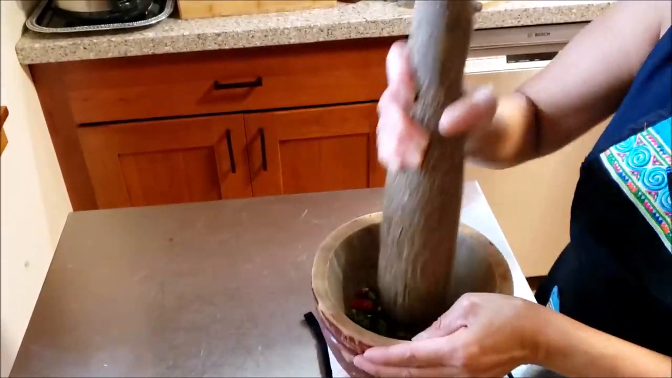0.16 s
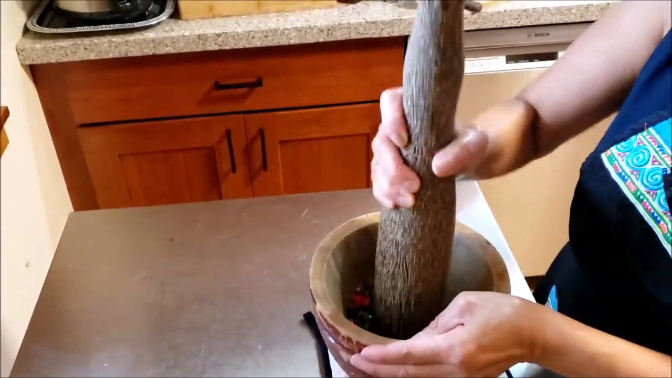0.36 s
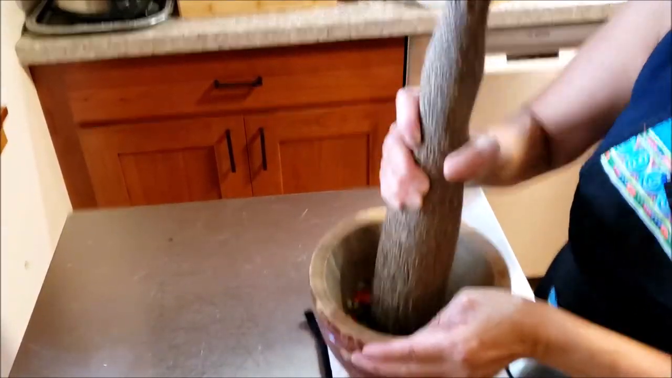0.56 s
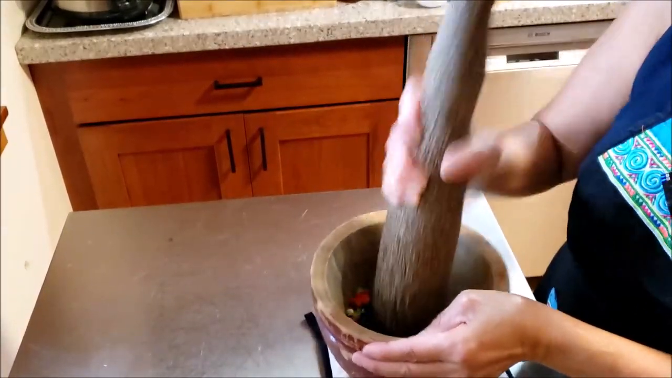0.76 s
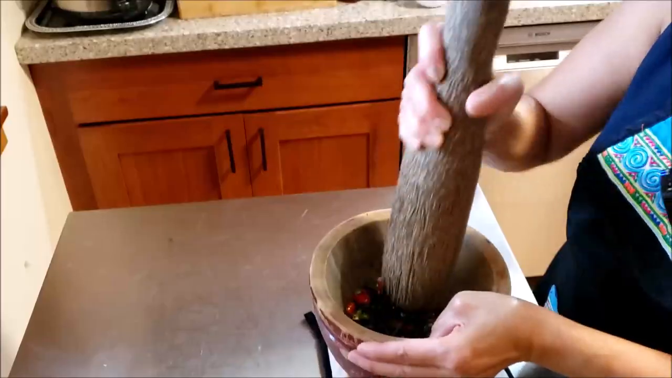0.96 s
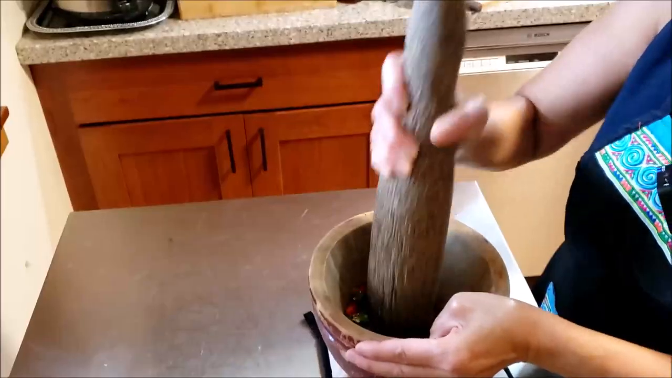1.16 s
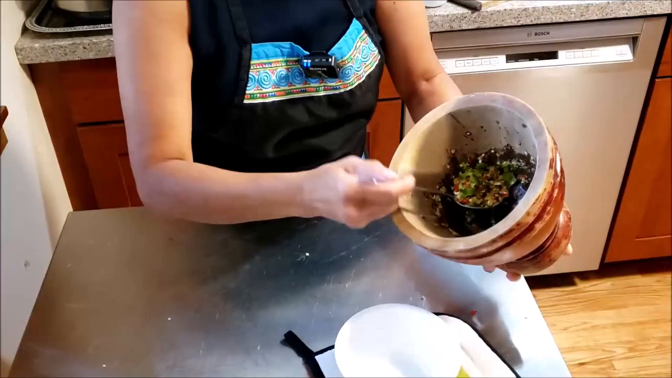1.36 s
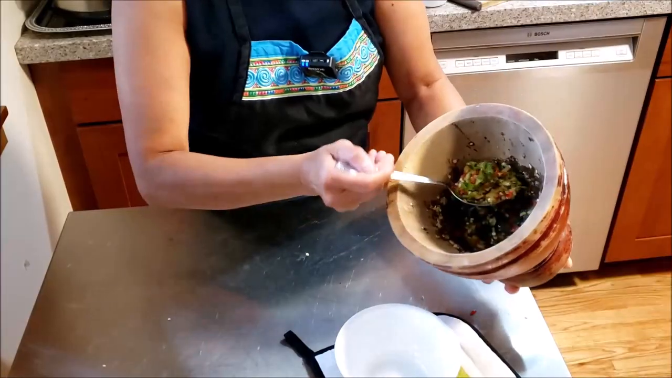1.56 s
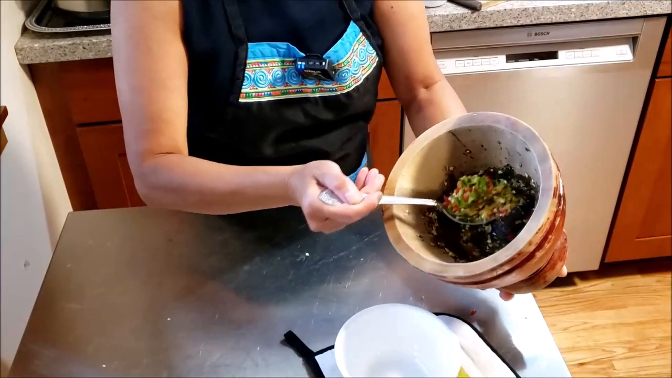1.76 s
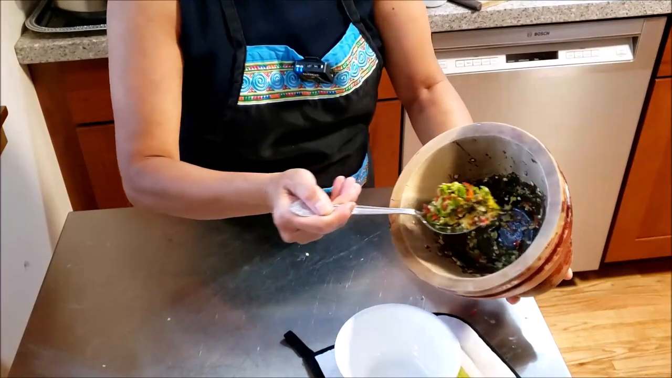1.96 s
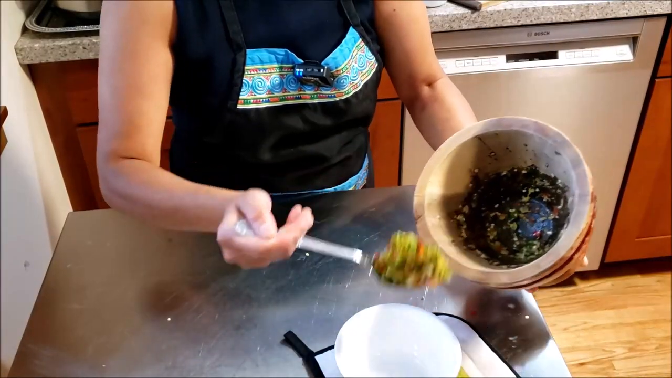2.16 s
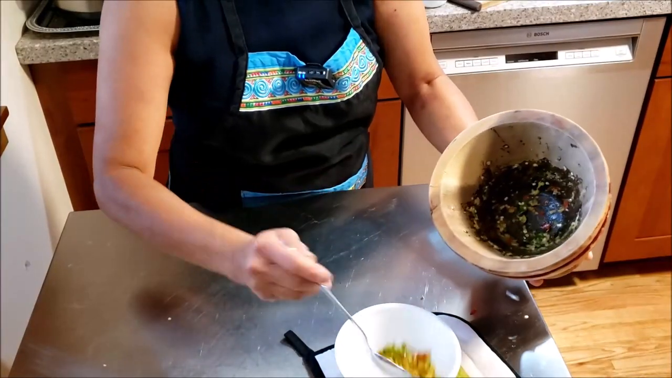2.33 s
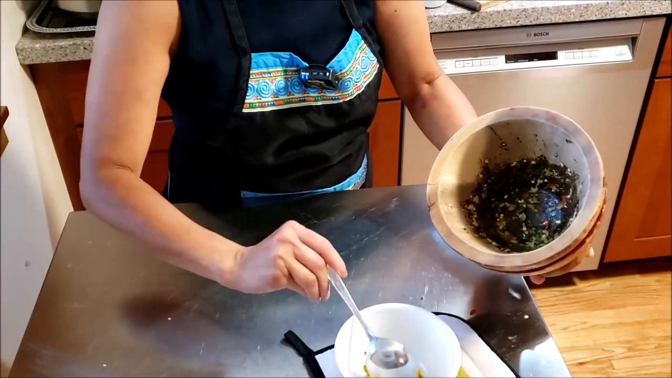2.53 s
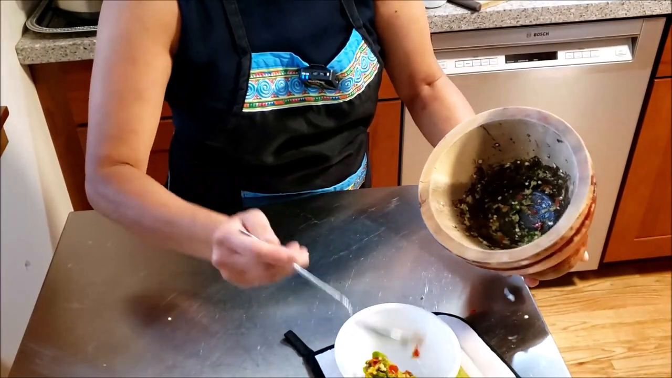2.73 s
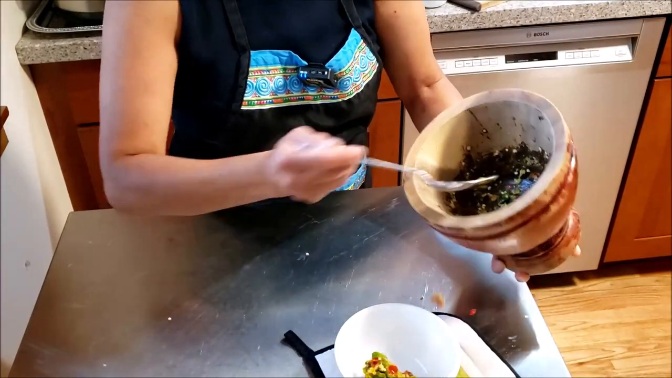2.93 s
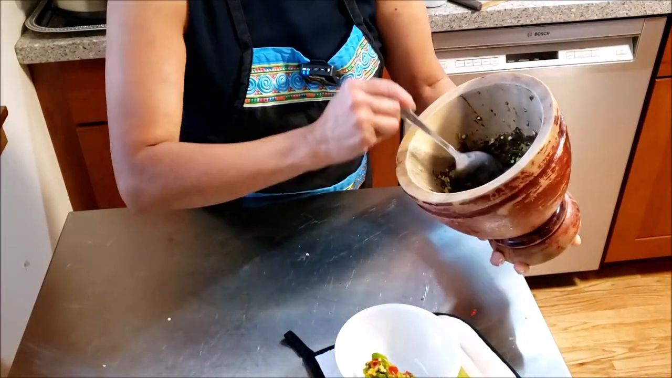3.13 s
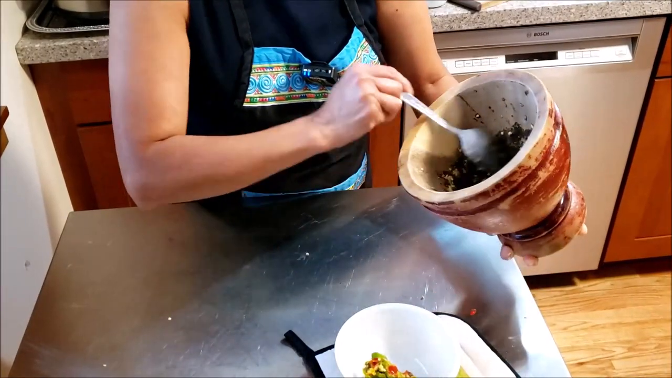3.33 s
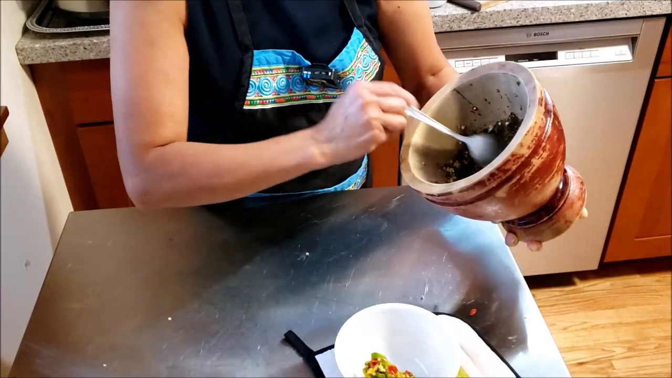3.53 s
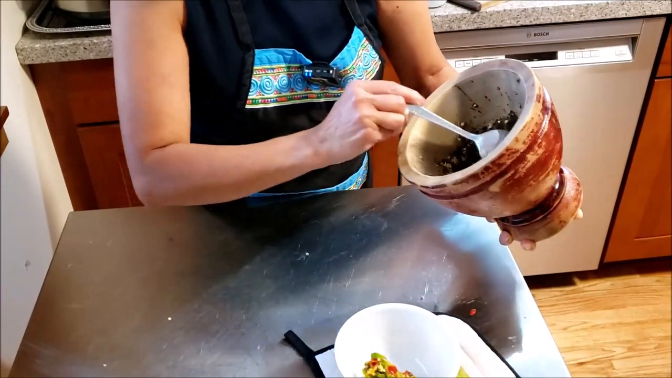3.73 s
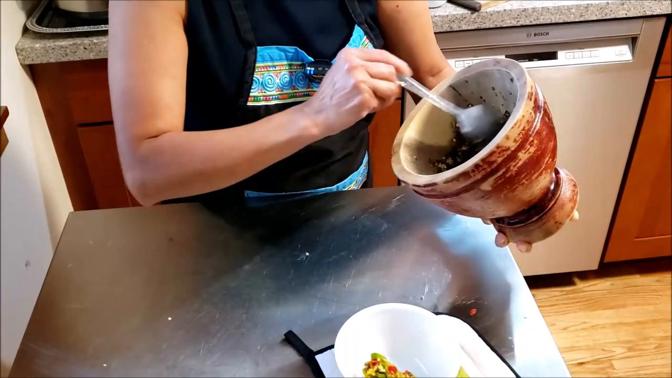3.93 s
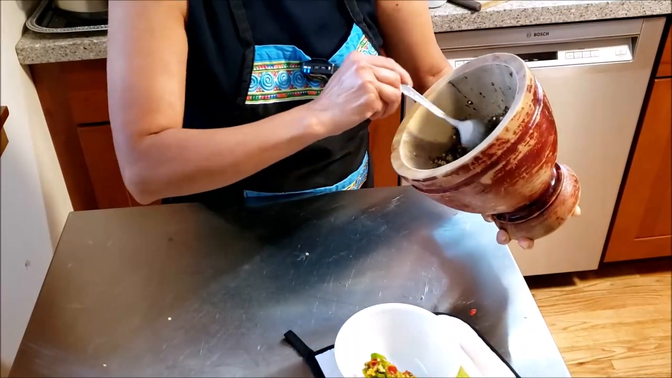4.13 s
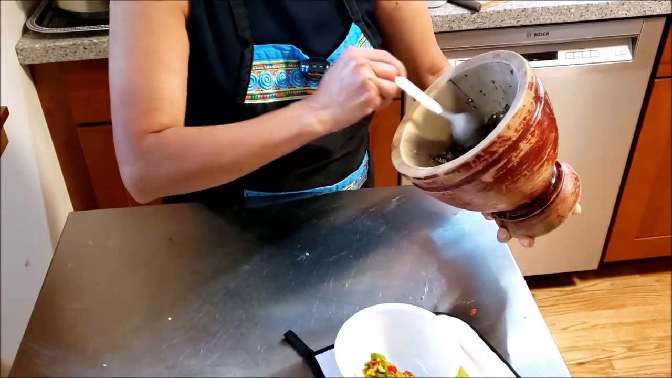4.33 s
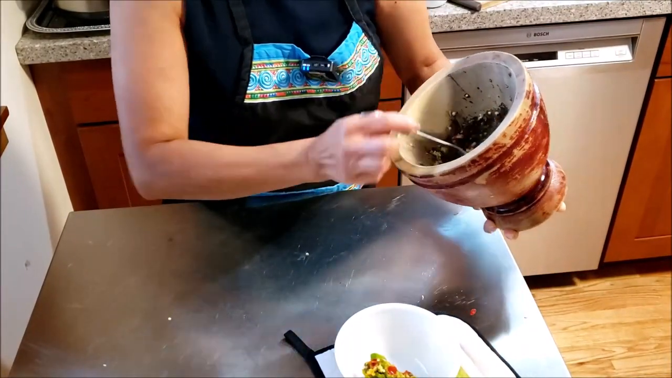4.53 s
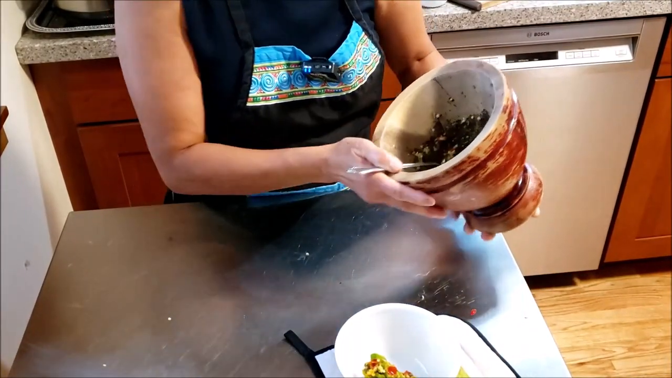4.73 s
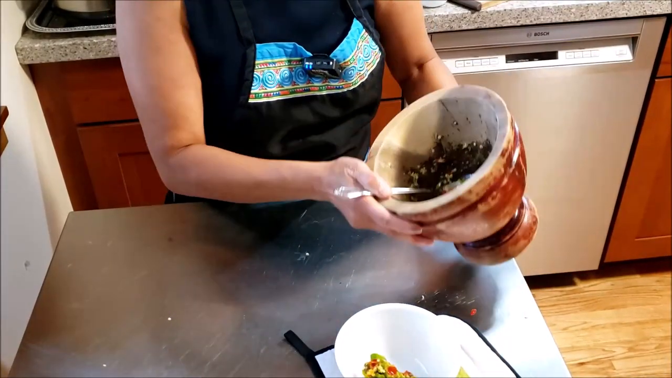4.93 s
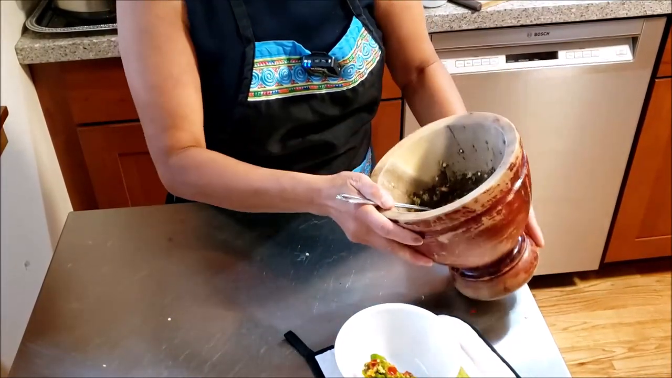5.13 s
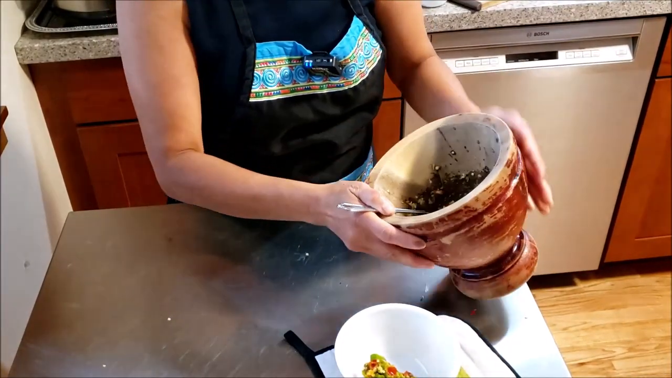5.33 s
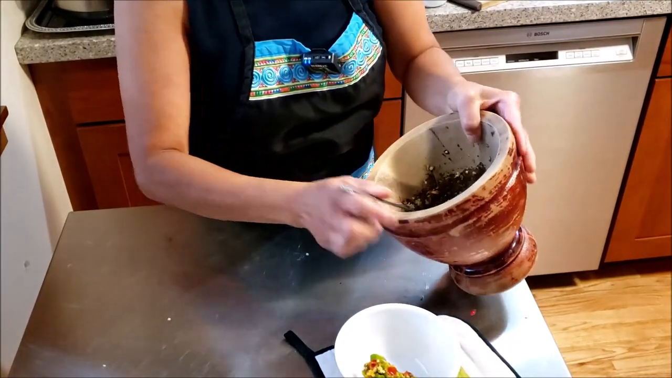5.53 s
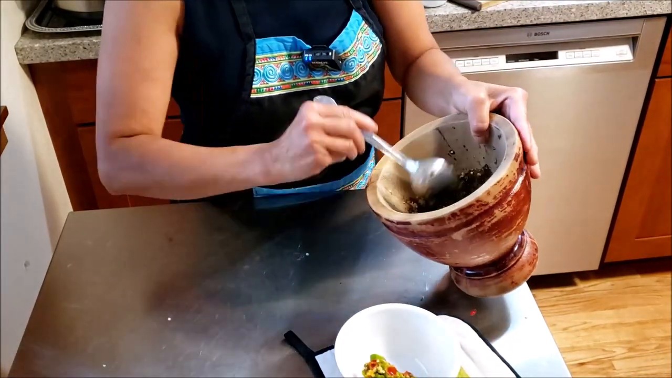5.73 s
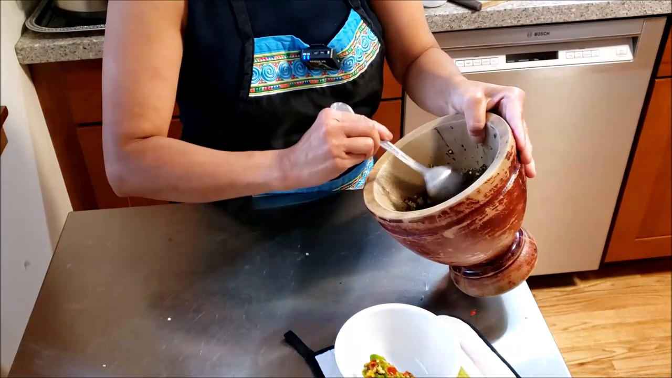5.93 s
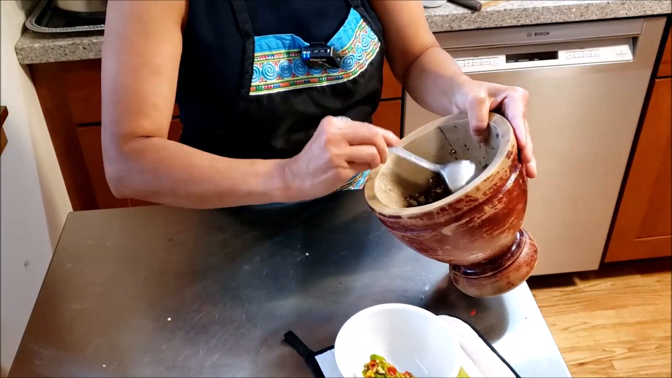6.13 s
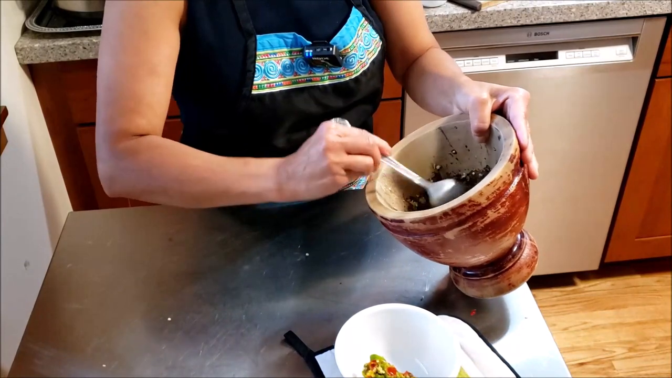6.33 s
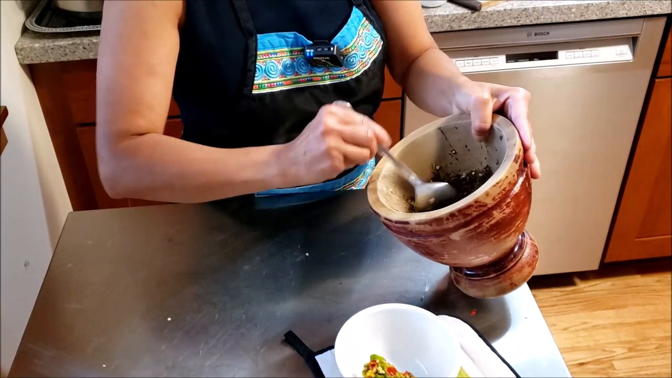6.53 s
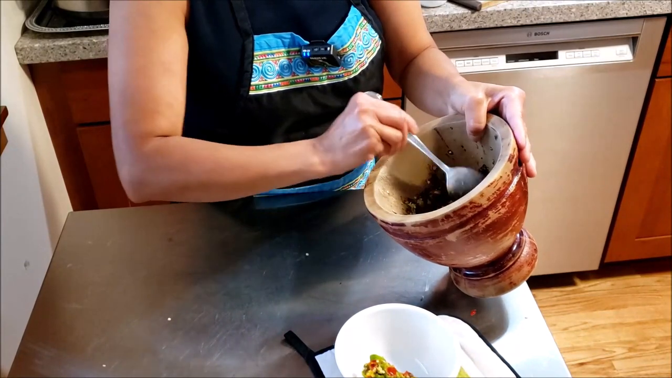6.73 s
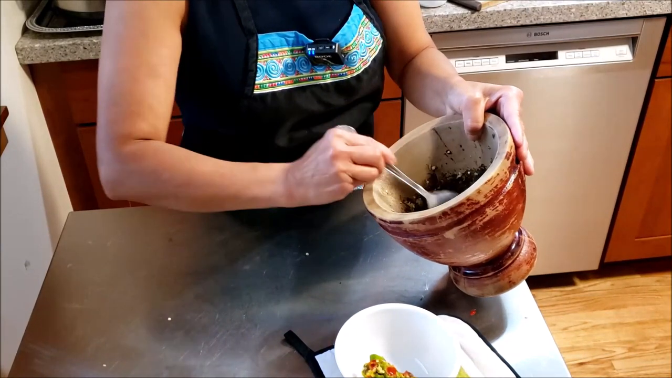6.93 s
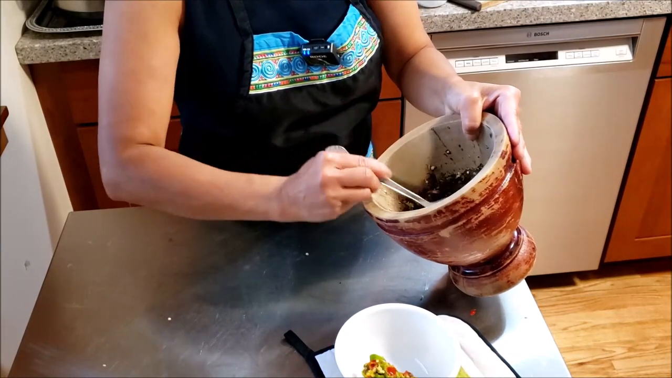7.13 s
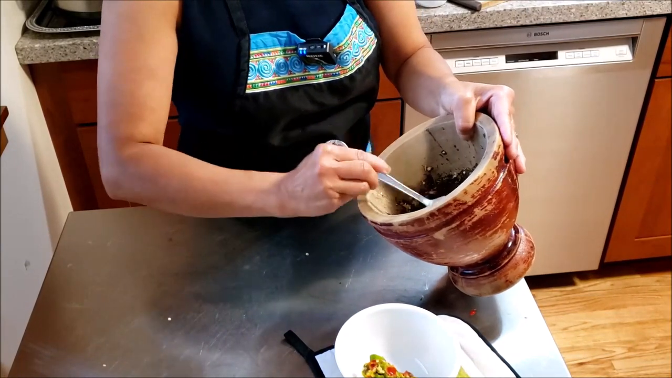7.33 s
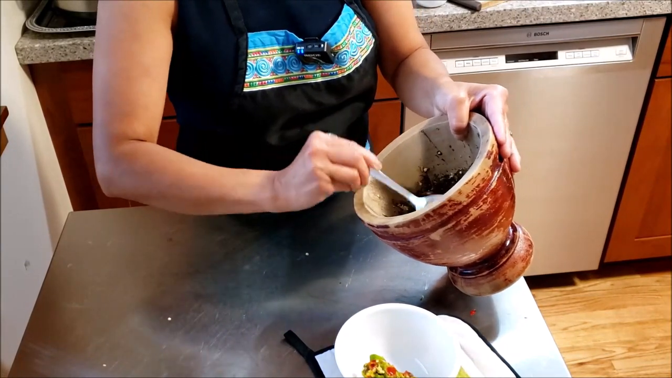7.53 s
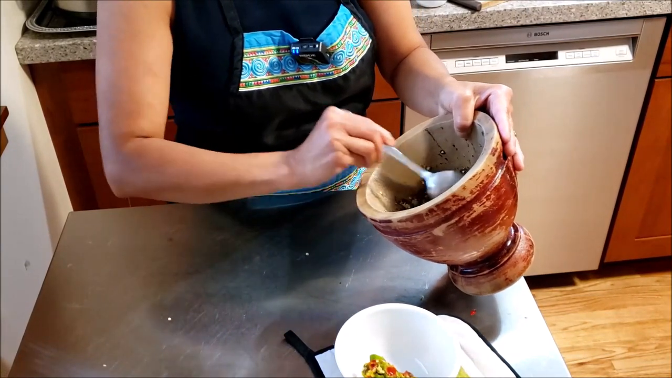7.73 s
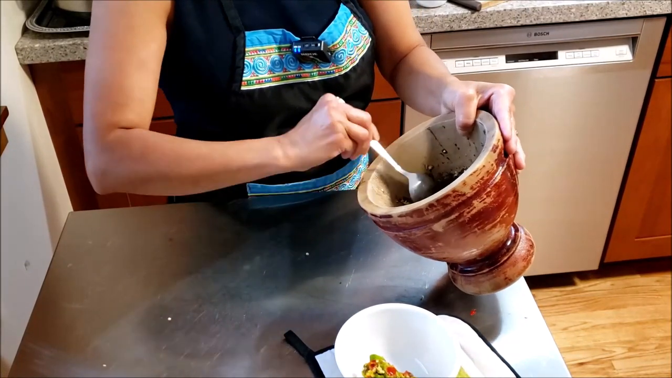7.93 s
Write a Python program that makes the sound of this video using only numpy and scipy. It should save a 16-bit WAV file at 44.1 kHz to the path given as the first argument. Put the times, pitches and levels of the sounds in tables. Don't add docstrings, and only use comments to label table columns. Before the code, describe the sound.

Five hollow wood-on-wood pounding blows with leafy crunches, a cut to a quiet pause, then busy spoon knocks and scrapes around a resonant mortar.

```python
import sys
import numpy as np
from scipy import signal
from scipy.fft import rfft, irfft, next_fast_len
from scipy.io import wavfile
from scipy.ndimage import uniform_filter1d, map_coordinates

SR = 44100
rng = np.random.default_rng(int(sys.argv[2]) if len(sys.argv) > 2 else 0)


def level_to_linear(level):
    exponent = np.asarray(level, float) / 20
    return 10 ** exponent


def wav_out(sig):
    wavfile.write(sys.argv[1], SR, np.round(np.clip(np.atleast_2d(sig).T, -1, 1) * 32767).astype(np.int16))


N = 355887
CUT_S = 1.318
REGRIP_S = 4.7

# (frequency [Hz], level per Hz [dB])
HUM = [(15, -54), (25, -27), (53, 0.5), (97, 1.5), (135, -4), (388, -17.5), (553, -35), (854, -26.5),
       (2040, -29), (6910, -28.5), (7710, -32), (8590, -35.5), (15700, -46), (16500, -54)]
# (time [s], level [dB])
MURMUR = [(0, -49), (1.3, -44.5), (1.34, -59), (2.4, -65.5), (2.6, -59.5), (3.05, -46.5), (3.8, -51),
          (4.65, -62.5), (5.85, -63), (8.07, -71)]
# (frequency [Hz], T60 [s])
KITCHEN_T60 = [(80, 0.19), (300, 0.54), (1000, 0.51), (3000, 0.36), (8000, 0.35), (16000, 0.27)]
# (time [s], peak [dB], pitch [Hz], length [s])
BUMPS = [(1.594, -21, 112, .03), (1.622, -31, 100, .028), (1.641, -22, 129, .034), (1.675, -37, 80, .04),
         (1.712, -31, 97, .035), (1.75, -20, 108, .045), (1.788, -27, 90, .035), (1.82, -26, 110.3, .038),
         (1.862, -24, 112, .03), (1.898, -29, 102, .028), (1.92, -29, 100, .03), (1.985, -41, 90, .06)]
# (time [s], length [s], level [dB], lowest frequency [Hz])
RUBS = [(1.469, 0.23, -56.5, 1630), (2.537, 0.19, -60, 2640), (4.776, 0.15, -47.5, 2850),
        (4.882, 0.43, -52, 2920), (4.761, 0.89, -61, 2580), (5.309, 0.082, -48.5, 2980),
        (5.39, 0.23, -52, 2600), (5.474, 0.25, -51, 2630)]

# (frequency [Hz], width [Hz], level [dB])
COUNTER = [(46, 14, -10.5), (66.4, 11, -22), (88, 10.5, 3.5), (129.3, 20, 4.5), (190, 44, -4.5)]
# (frequency [Hz], width [Hz], level [dB])
BELLY = [(232, 6.4, -15.5), (268.1, 10.3, 1), (348.7, 55, 1.5), (458.4, 63, -2)]
# (frequency [Hz], width [Hz], level [dB])
BOWL = [(566.3, 73, 0.43), (650, 83, -1.7), (702.5, 17.8, -1.2), (828.4, 32.3, -0.31), (1102, 233, 0.098)]
# (frequency [Hz], width [Hz], level [dB])
SPOON = [(1350, 150, -16.5), (1550, 27, -10.5), (1790, 19.4, -13), (2150, 99, -11.5), (2250, 64, -17.5),
         (2640, 30, -10), (3110, 37, -7), (3600, 37, -10), (4530, 94, -14), (5150, 66, -13.5),
         (7250, 180, -24)]
# (frequency [Hz], width [Hz], level [dB])
SPOON_TIP = [(7250, 90, -10), (8250, 80, 0), (9000, 150, -11), (11100, 110, -4), (11750, 140, -6),
             (12500, 110, -10), (14150, 130, -9), (15500, 130, -10)]
# (frequency [Hz],
# width [Hz], level [dB])
PESTLE = [(135, 36, 12), (460, 120, -1.5), (575, 40, 1), (814, 60, 2.5), (1090, 99, -8), (1540, 110, -24.5)]
# (frequency [Hz], level per Hz [dB])
HERBS = [(710, -52.5), (1200, -3), (1320, -14), (1490, -3), (2030, -6.5), (3400, -2.5), (6640, -6),
         (14900, -29), (16000, -39), (16500, -48.5)]

# (time [s], belly peak [dB], thud [dB], rattle [dB])
SET_DOWN = [
    (5.174, -5.5, -8, -10),
    (5.241, -14, -5.5, -9.5),
]
FOOT_DOWN_S = SET_DOWN[0][0]
# (time [s], peak [dB], pitch [Hz], body level [dB], body pitch [Hz])
TICKS = [(1.835, -61, 4600, 8, 405), (2.457, -44.5, 4300, -25, 890), (2.499, -48, 3870, -19, 950),
         (2.5736, -39.5, 4100, 2, 406), (2.7684, -45, 7100, -16, 907), (4.062, -52, 5460, -16, 900),
         (7.106, -61, 8000, -12, 900)]
# (time [s], length [s], bowl level [dB], spoon level [dB], fade over half the stroke [dB])
DRAGS = [(3.093, 0.032, -32.5, -41.5, 6), (3.139, 0.03, -30.5, -45, 2), (3.281, 0.015, -50, -48, 6.5),
         (3.332, 0.046, -29, -45.5, 7), (3.371, 0.037, -36, -48, 1.5), (3.591, 0.055, -28, -30, -7),
         (3.833, 0.023, -34, -41.5, 2.5), (3.851, 0.067, -30.5, -45.5, 2), (4.039, 0.024, -35, -58, 2),
         (4.075, 0.071, -37, -44.5, 5), (4.289, 0.088, -27.5, -42.5, -4), (4.389, 0.024, -43, -33, 7),
         (4.511, 0.057, -47.5, -48, 5), (4.718, 0.042, -39, -59, 3.5), (5.468, 0.029, -45, -38, 4.5),
         (5.597, 0.057, -43, -71, -4), (5.89, 0.063, -29.5, -23, 1.5), (6.049, 0.046, -28, -30.5, 3.5),
         (6.207, 0.064, -35, -39.5, 3), (6.265, 0.068, -33.5, -41.5, -.5), (6.448, 0.056, -45, -43, 11.5),
         (6.49, 0.11, -46, -45.5, 7.5), (6.673, 0.044, -37.5, -38, -1), (6.717, 0.1, -36.5, -42.5, 6),
         (6.968, 0.068, -32, -48, 3.5), (7.167, 0.042, -41, -44.5, 4.5), (7.202, 0.058, -32, -49.5, 3),
         (7.405, 0.052, -32, -47.5, 6), (7.6, 0.019, -33.5, -60, 1.5), (7.634, 0.05, -32, -41.5, 0),
         (7.865, 0.054, -33.5, -44.5, 1.5), (7.897, 0.058, -31, -53, -2)]
# (time [s], length
# [s], level [dB], pitch [Hz])
SINGS = [(3.337, 0.038, -31.5, 2820), (3.83, 0.017, -40, 2560), (3.882, 0.044, -43, 2510),
         (3.938, 0.01, -30, 3110), (4.078, 0.026, -28, 3620), (4.079, 0.02, -32, 4820),
         (4.357, .03, -35, 2520), (4.391, 0.016, -29.5, 2420), (4.542, 0.0095, -29.5, 7500),
         (4.721, 0.025, -29, 1760), (4.868, 0.046, -43.5, 3000), (4.87, 0.05, -44, 3670),
         (4.722, 0.057, -29, 877), (2.458, .014, -53, 4300), (2.574, 0.06, -52, 1175),
         (5.468, 0.05, -38.5, 900), (5.895, 0.062, -28.5, 1820), (6.215, .03, -38, 2560),
         (6.224, 0.049, -34, 4510), (6.231, 0.038, -32.5, 3180), (6.469, 0.038, -32, 3160),
         (6.473, 0.019, -31, 4640), (6.724, 0.014, -22.5, 3530), (6.978, 0.056, -39.5, 2480),
         (6.967, 0.055, -48, 5150), (7.176, 0.036, -52.5, 5150), (7.211, 0.024, -36, 2540),
         (7.415, 0.015, -30, 2570), (7.575, 0.019, -39, 3600), (7.611, 0.02, -30.5, 4480),
         (7.639, 0.043, -37, 2460), (7.89, 0.023, -44, 3070), (7.931, 0.015, -31, 2440),
         (7.903, 0.045, -35, 1800),
         (5.468, .018, -29.5, 1790), (7.1, .03, -40, 385), (4.55, .03, -40, 690), (3.6, 0.041, -33, 1100),
           (3.61, 0.043, -36, 2180), (3.085, 0.015, -31, 1790), (3.109, .018, -29, 2940),
           (3.111, 0.019, -34, 8200), (3.152, 0.024, -36, 2460), (3.595, 0.032, -15, 710),
           (3.598, 0.024, -32, 2540), (3.6, 0.028, -29, 1810), (3.2, 0.03, -37, 3000),
           (3.951, 0.024, -50, 2640), (6.05, 0.06, -24, 721), (6.722, 0.027, -34.5, 2570),
           (6.963, 0.067, -48.5, 8350), (4.9, 0.052, -56, 8250), (5.9, 0.036, -67, 7300),
           (4.9, 0.023, -42, 5150), (7.612, 0.048, -59, 8400), (6.8, 0.027, -36, 1810),
           (7.61, 0.017, -30.5, 3400)]
# (time [s], bowl peak [dB], bowl pitch [Hz], spoon peak [dB], spoon pitch [Hz])
LANDINGS = [(3.377, -10.5, 810, -13.5, 2420), (3.529, -6, 516, -11.5, 3360), (3.793, -15, 900, -17, 3370),
            (3.941, -39, 684, -13, 2170), (4.042, -18.5, 860, -26, 2640), (4.114, -11, 780, -21, 1690),
            (4.146, -10.5, 740, -25, 1930), (4.276, -13.5, 336, -9, 3280), (4.39, -25, 810, -15.5, 2200),
            (4.721, -17, 880, -15, 1790), (4.731, -19, 830, -26, 3110), (4.74, -15.5, 840, -21.5, 3110),
            (4.753, -25, 850, -26, 4650), (4.761, -19.5, 380, -23, 1790), (5.267, -19, 365, -26.5, 3110),
            (5.467, -25.5, 850, -6, 3700), (5.891, -8, 710, -6.5, 3110), (5.9, -9, 704, -12.5, 1790),
            (5.909, -9, 725, -12.5, 3110), (6.0477, -5, 710, -8.5, 1790), (6.2628, -15.5, 764, -18.5, 3320),
            (6.319, -20, 262, -25.5, 1680), (6.442, -11.5, 690, -14.5, 3110),
            (6.485, -20, 269, -20.5, 3600), (6.9263, -23, 720, -11.5, 3110),
            (6.926, -24.5, 706, -16.5, 1550), (7.5756, -13, 788, -13.5, 3200), (7.8447, -7, 732, -20, 3110),
            (7.938, -22, 842, -27, 1760)]
# (time [s], bowl peak [dB], bowl pitch [Hz], spoon peak [dB], spoon pitch [Hz])
EDGE_TAPS = [(3.082, -8, 832, -18.5, 1790), (3.119, -18, 710, -18, 2640), (3.286, -15, 344, -29.5, 3280),
             (3.33, -6, 723, -15.5, 2770), (3.838, -22, 708, -30, 2570), (3.85, -15, 694, -26, 2640),
             (4.514, -30, 576, -45, 2490), (4.543, -26, 718, -24.5, 2470), (5.585, -27.5, 385, -36, 3700),
             (5.622, -21.5, 880, -28, 1890), (6.205, -20, 900, -18.5, 3800),
             (6.6642, -13.5, 890, -14, 2120), (7.021, -17, 370, -23.5, 2860), (7.194, -15, 710, -28, 2540),
             (7.41, -14.5, 690, -24.5, 2640)]
# (time [s], bowl peak [dB], spoon peak [dB], spoon pitch [Hz])
CATCHES = [(3.058, -55, -37, 3000), (3.1525, -11, -23, 2650), (3.167, -15.5, -28.5, 2550),
           (3.403, -40, -25, 2510), (3.592, -4, -21, 2000), (3.598, -5.5, -22, 2590),
           (3.8535, -16, -30, 2800), (3.858, -12, -32, 2560), (3.8655, -14, -36, 2560),
           (3.8884, -14.5, -36, 2540), (3.884, -15, -41, 2540), (3.907, -19.5, -35, 2530),
           (3.928, -36, -36, 3110), (4.078, -15, -27, 3780), (4.103, -13.5, -21.5, 1790),
           (4.323, -13, -34, 1600), (4.329, -18, -34, 2520), (4.344, -16.5, -33, 2520),
           (4.3527, -14, -31, 2520), (4.361, -24, -28, 3600), (4.369, -17, -30, 2520),
           (4.3785, -15, -27, 2240), (5.886, -46, -36, 3900), (6.719, -26, -27, 3670),
           (6.758, -21.5, -30, 2620), (6.789, -20.5, -39, 3020), (6.9665, -10.5, -34, 3130),
           (6.986, -26, -39, 2520), (7.001, -19, -28, 3110), (7.156, -22, -41, 3050),
           (7.172, -21.5, -33.5, 3070), (7.241, -23.5, -27, 2520), (7.3815, -13, -27, 3110),
           (7.615, -29, -28, 4440), (7.6295, -10, -21.5, 2970), (7.669, -25, -28.5, 2480),
           (7.896, -27, -27.5, 2950), (7.908, -16, -32, 1860)]

# (time [s], bowl peak [dB], belly [dB], counter thud [dB], crunch [dB])
BLOWS = [
    (0.053, -6.5, -16.5, -28, -8),
    (0.314, -13, -22, -25.5, -13),
    (0.588, -8.5, -3.5, -15, 2),
    (0.854, -5.5, -4.5, -17, 0.5),
    (1.131, -33.5, 7.5, 2, 17.5),
]
# (time [s], peak [dB])
LEAD_CRUNCHES = [(.051, -11.5), (.312, -23), (.584, -12.5), (.851, -9), (1.121, -12.5)]
# (time [s], peak [dB])
LATE_CRUNCHES = [(0.058, -17), (0.324, -15.5), (0.335, -25), (0.5964, -44), (0.618, -19.5), (0.882, -35),
                 (1.131, -19)]
# (time [s], peak [dB], favoured pitch [Hz])
KNOCKS = [(.053, -12, 900), (.055, -13, 575), (.058, -13.5, 800), (0.062, -7.5, 135), (.316, -13.5, 500),
          (0.3171, -19.5, 990), (0.328, -16.5, 830), (.334, -29, 830), (.589, -13.5, 480), (0.596, -7, 135),
          (.856, -27, 750), (.862, -5, 135), (.885, -17, 760), (1.132, -33, 480)]


def unit(x):
    return x / np.sqrt(np.mean(x ** 2) + 1e-20)


def along(points, hz):
    f, v = np.transpose(points)
    return np.interp(np.log(hz + 1), np.log(f + 1), v)


def add(track, s, sound):
    part = track[round(s * SR):][:len(sound)]
    part += sound[:len(part)]


def filtered(x, response):
    m = next_fast_len(len(x) + SR // 2)
    return irfft(rfft(x, m) * response(np.fft.rfftfreq(m, 1 / SR)), m)[:len(x)]


def coloured(size, gain):
    m = 2048 * (size // 2048 + 1)
    spectrum = rfft(rng.standard_normal(m)) * gain(np.fft.rfftfreq(m, 1 / SR))
    return unit(irfft(spectrum))[:size]


def puff(spectrum, rise, t60):
    t = np.arange(min(8000, int(2 * t60 * SR))) / SR
    noise = coloured(len(t), lambda hz: level_to_linear(along(spectrum, hz)))
    return noise * level_to_linear(-60 * t / t60) * (1 - np.exp(-(t / rise) ** 2)) * (1 - t / t[-1])


def body(modes):
    def response(f):
        total = 0
        for k, (hz, width, db) in enumerate(modes):
            total = total + (-1) ** k * level_to_linear(db) * 1j * f * width / (hz * hz - f * f + 1j * f * width)
        return total
    return response


def favour(modes, centre_hz, octaves, most_db):
    return [(hz, width, db + most_db * np.exp(-(np.log2(hz / centre_hz) / octaves) ** 2))
            for hz, width, db in modes]


def strike(modes, attack, damp=1, scatter_db=2):
    hz, width, db = np.transpose(modes)[:, :, None]
    t = np.arange(int(SR * 2 / (width.min() * damp))) / SR
    strength, shift = rng.standard_normal((2,) + hz.shape)
    size = level_to_linear(db + scatter_db * strength) * width ** .5
    ring = size * np.exp(-np.pi * width * damp * t) * np.sin(2 * np.pi * hz * (1 + .01 * shift) * t)
    ring = np.sum(ring, axis=0) * (1 - np.exp(-(t / attack) ** 2))
    return ring / np.max(abs(ring))


def stroke(length, edge, release=1):
    t = np.arange(int(length * SR)) / SR
    nearest_end = np.minimum(t, (length - t) / release)
    return np.sin(np.pi / 2 * np.clip(nearest_end / edge, 0, 1)) ** 2, t / length


def thud_db(s):
    return -17 if s > FOOT_DOWN_S else -31.5


def air():
    t = np.arange(N) / SR
    hum = level_to_linear(-50.5 + 3.2 * (t < CUT_S)) * coloured(N, lambda hz: level_to_linear(along(HUM, hz)))
    colour = [(120, -30), (300, 0), (900, -6), (2000, -20), (4000, -36), (16000, -70)]
    murmur = coloured(N, lambda hz: level_to_linear(along(colour, hz)))
    s, db = np.transpose(MURMUR)
    murmur_db = np.interp(t, s, db, -120, -120)
    lull = (t > CUT_S) * np.clip((2.74 - t) / 0.2, 0, 1)
    return hum * level_to_linear(-5.5 * lull) + level_to_linear(murmur_db) * murmur


def kitchen(x):
    wet, hop = np.zeros(N), SR // 4
    for start in range(0, N, hop):
        hz, t, z = signal.stft(rng.standard_normal(SR // 2), SR, nperseg=256)
        decay = level_to_linear(-60 * t / along(KITCHEN_T60, hz)[:, None])
        tail = signal.istft(z * decay, SR, nperseg=256)[1]
        answer = signal.fftconvolve(x[start:start + hop], tail / np.linalg.norm(tail))
        add(wet, start / SR + .008, answer)
    return wet


def bumps():
    x = np.zeros(N)
    for s, db, hz, length in BUMPS:
        pressure, done = stroke(length, edge=length * .4, release=1.4)
        turn = 2 * np.pi * hz * length * done
        add(x, s, level_to_linear(db) * pressure * (np.sin(turn) + .12 * np.sin(2.5 * turn)))
    return x


def rub():
    x = np.zeros(N)
    for s, length, db, low_hz in RUBS:
        pressure = stroke(length, edge=length * 0.36)[0]
        colour = [(low_hz * 0.79, -18), (low_hz, 0), (5500, -4), (9000, -13), (16000, -26)]
        hiss = coloured(len(pressure), lambda f: (0.35 + abs(body(SPOON)(f))) * level_to_linear(along(colour, f)))
        wander = map_coordinates(rng.standard_normal(40), [np.arange(len(pressure)) / 1500], order=1)
        add(x, s, level_to_linear(db + 1.5 * wander) * pressure * hiss)
    return x


def set_down():
    x = np.zeros(N)
    rattle = [(150, -4.5), (400, 5.5), (1000, -8.5), (1700, -20), (2500, -37), (4000, -61)]
    for s, db, counter_db, rattle_db in SET_DOWN:
        add(x, s, level_to_linear(db) * strike(BELLY, attack=0.0015, damp=0.98))
        add(x, s, level_to_linear(db + counter_db + 5.5) * strike(COUNTER, attack=0.0027, damp=0.72))
        add(x, s, level_to_linear(db + rattle_db) * puff(rattle, rise=0.00027, t60=0.45))
    return x


def ticks():
    x = np.zeros(N)
    for s, db, hz, body_db, body_hz in TICKS:
        tick = [(hz * 0.76, -15), (hz, 0), (hz * 1.0, -8), (16000, -18)]
        dish = [(200, -20), (body_hz, 0), (1300, -6), (2000, -18), (3000, -26)]
        add(x, s, level_to_linear(db - 4.5) * puff(tick, rise=0.00049, t60=0.028))
        add(x, s, level_to_linear(db + body_db) * puff(dish, rise=0.00017, t60=0.067))
    return x


def shifting(x, depth_db):
    z = signal.stft(x, nperseg=256)[2]
    field = uniform_filter1d(rng.standard_normal(z.shape), size=4, axis=0)
    field = uniform_filter1d(field, size=14, axis=1)
    return signal.istft(z * level_to_linear(depth_db * field / field.std()), nperseg=256)[1][:N]


def radiated(force, modes, share):
    def band(f):
        low = 1 / (1 - 1j * .6 * modes[0][0] / (f + 1)) ** 2
        ratio = f / modes[-1][0]
        return (body(modes)(f) + share) * low / (1 + 1.3j * ratio - ratio ** 2) ** 2
    return filtered(force, band) / np.sqrt(np.mean(abs(band(np.arange(SR // 2))) ** 2))


def scrape(slips_per_s=2800, spread_db=2.2, hiss=0.82):
    slip = (rng.random(N) < slips_per_s / SR) * level_to_linear(spread_db * rng.exponential(1, N)) * rng.standard_normal(N)
    clump = level_to_linear(2.3 * map_coordinates(rng.standard_normal(N // 300 + 4), [np.arange(N) / 300]))
    force = unit(shifting((unit(slip) + hiss * rng.standard_normal(N)) * clump, depth_db=2.5))
    push = np.zeros((5, N))
    for s, length, bowl_db, spoon_db, fade_db in DRAGS:
        short_grip = s > REGRIP_S
        upper_db = min(spoon_db, -41) + (-5 if short_grip else -6)
        tip_db = upper_db + 4.0 + (-17 if short_grip else -7.5)
        pressure, done = stroke(length + 0.013, edge=0.0047, release=5.0)
        levels = (bowl_db + thud_db(s), bowl_db, spoon_db - 5.5, upper_db, tip_db)
        for drive, db in zip(push, levels):
            add(drive, s, pressure * level_to_linear(db - fade_db * (2 * done - 1.5)))
    wood = favour(BELLY + BOWL[:-1], 760, .3, most_db=6)
    bodies = (COUNTER, wood, SPOON[:8], SPOON[8:], SPOON_TIP)
    shares = (.02, .05, .13, .03, .01)
    return sum(radiated(force * drive, modes, share) for drive, modes, share in zip(push, bodies, shares))


def sing():
    x = np.zeros(N)
    for s, length, db, hz in SINGS:
        pressure, done = stroke(length + 0.0048, edge=0.004, release=2.8)
        mode = body([(hz, hz / 28, 0)])
        tone = coloured(len(pressure), lambda f: abs(mode(f)) + 0.11 * abs(body(SPOON)(f)))
        add(x, s, level_to_linear(db - 7.3 * done) * pressure * tone)
    return x


def tap(x, s, db, wood_hz, ring_db, ring_hz, damp, tip_db):
    wood = favour(BELLY + BOWL, wood_hz, 0.19, most_db=13.0)
    steel = favour(SPOON, ring_hz, 0.16, most_db=11.0)
    click = [(ring_hz / 3, -20), (ring_hz, 0), (ring_hz * 2.0, -18), (9000, -38), (14000, -54)]
    if s > REGRIP_S:
        tip_db = tip_db - 0.5
    tip = level_to_linear(ring_db + tip_db - 4)
    add(x, s, level_to_linear(db) * strike(wood, attack=0.00041, damp=damp))
    add(x, s, level_to_linear(db + thud_db(s)) * strike(COUNTER, attack=0.018, damp=1.47))
    add(x, s, level_to_linear(ring_db) * strike(steel, attack=0.00023, damp=3.05))
    add(x, s, level_to_linear(ring_db - 8) * puff(click, rise=0.00059, t60=0.031))
    add(x, s, tip * strike(SPOON_TIP, attack=.0001, damp=2))
    add(x, s, tip * puff([(5000, -30), (8000, 0), (16000, -12)], rise=.0002, t60=.01))


def taps():
    x = np.zeros(N)
    for row in LANDINGS:
        tap(x, *row, damp=1.13, tip_db=-25)
    for row in EDGE_TAPS:
        tap(x, *row, damp=1.2, tip_db=-9.5)
    u = (np.arange(-SR // 1000, SR // 500) / SR / 0.00042) ** 2
    snap = (1 - 2 * u) * np.exp(-u)
    for s, db, ring_db, ring_hz in CATCHES:
        add(x, s, level_to_linear(db + 1) * snap)
        tap(x, s, db, 690, ring_db, ring_hz, damp=1.8, tip_db=-19)
    return x


def pestle():
    x = np.zeros(N)
    wall = favour(BOWL[:-1], 780, 0.15, most_db=0.0)
    belly = favour(BELLY, 270, .15, most_db=10)
    wall_noise = [(300, 16), (500, 16.5), (900, 8.5), (1500, -28)]
    belly_noise = [(60, -31.0), (140, 8), (450, 7), (700, -38.5)]
    paste = [(800, -25), (1200, 4), (1550, -2), (2000, -32.5)]
    for s, db, belly_db, counter_db, crunch_db in BLOWS:
        add(x, s + 0.00093, level_to_linear(db) * strike(wall, attack=0.00071, damp=1.7))
        add(x, s + 0.001107, level_to_linear(db - 3.5) * puff(wall_noise, rise=0.00027, t60=0.072))
        add(x, s + .001, level_to_linear(db + belly_db) * strike(belly, attack=0.0037, damp=0.74))
        add(x, s + 0.0008, level_to_linear(db + belly_db - 5.0) * puff(belly_noise, rise=0.00023, t60=0.13))
        add(x, s + 0.0024, level_to_linear(db + counter_db + 12.5) * strike(COUNTER, attack=0.011, scatter_db=0))
        add(x, s - .003, level_to_linear(db + crunch_db - 18.0) * puff(HERBS, rise=0.11, t60=1.0))
        add(x, s + .01, level_to_linear(db + crunch_db - 26.5) * puff(paste, rise=0.039, t60=0.42))
    for s, db in LEAD_CRUNCHES:
        add(x, s, level_to_linear(db) * puff(HERBS, rise=0.003, t60=0.027))
    for s, db, hz in KNOCKS:
        club = favour(PESTLE, hz, 0.29, most_db=16)
        add(x, s, level_to_linear(db) * strike(club, attack=0.00055, damp=0.91))
    for s, db in LATE_CRUNCHES:
        add(x, s, level_to_linear(db - 5.0) * puff(HERBS, rise=0.0011, t60=0.039))
    return x


def scene():
    background = air() + bumps() + rub()
    spoon = set_down() + ticks() + scrape() + taps()
    chatter = sing()
    spoon_room = level_to_linear(-10.5) * kitchen(spoon + level_to_linear(-9) * chatter)
    pounding = pestle()
    first_shot = np.clip((CUT_S - np.arange(N) / SR) / 0.0044, 0, 1)
    first = first_shot * (pounding + level_to_linear(-6.5) * kitchen(pounding))
    return (background + spoon + chatter + spoon_room + first)[None]


def roll_off(x):
    return signal.sosfilt(signal.butter(12, 16640, fs=SR, output="sos"), x)


def record(dry):
    x = filtered(dry[0], lambda f: (1j * f / (42 + 1j * f)) ** 3)
    x = filtered(x, lambda f: 1 / (1 + (f / 15900) ** 60))[None]
    x = x / (1 + abs(x / .6) ** 4) ** (1 / 4)
    return roll_off(x)


dry = scene()
out = record(dry)
wav_out(out)
```